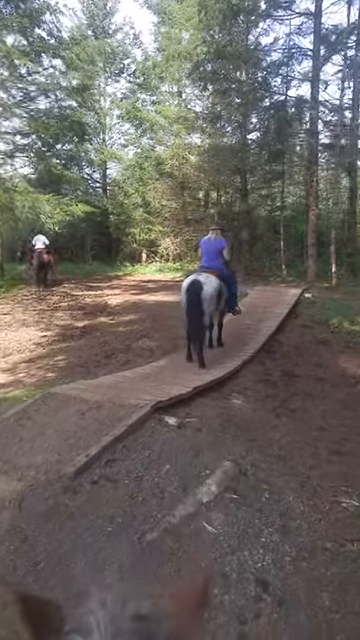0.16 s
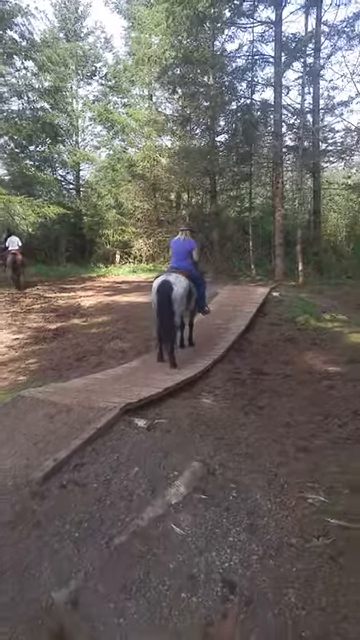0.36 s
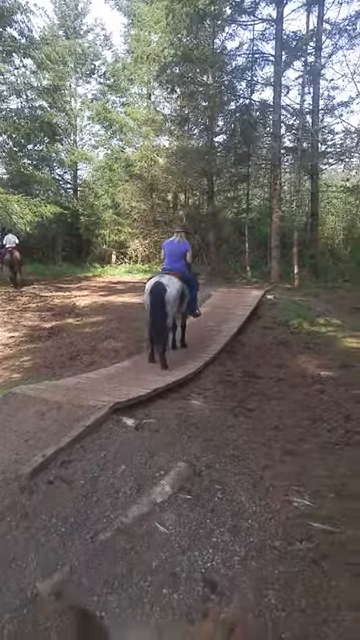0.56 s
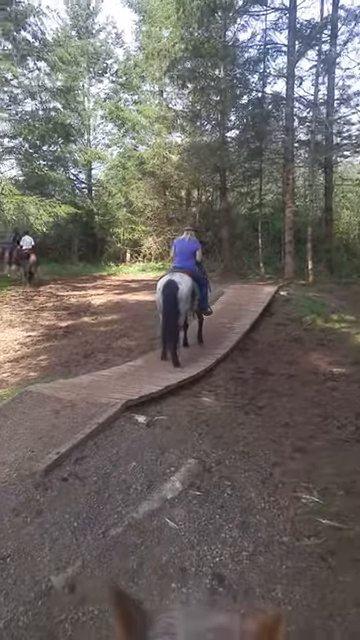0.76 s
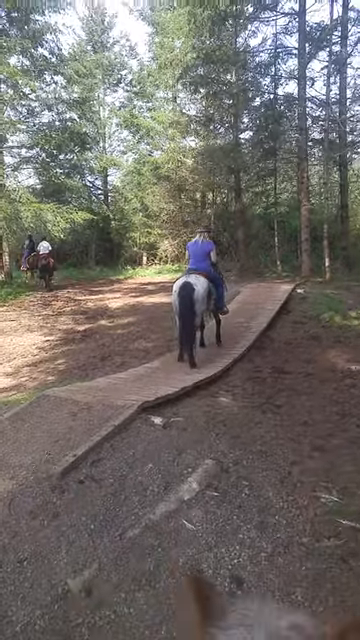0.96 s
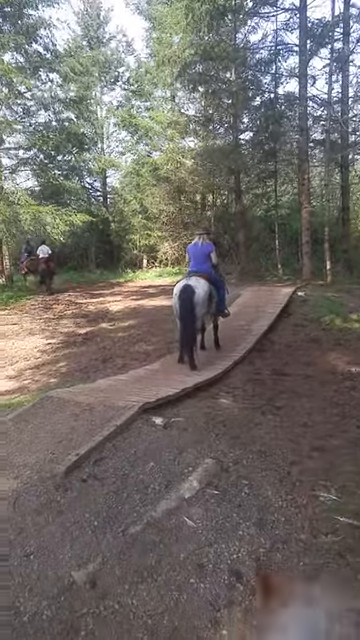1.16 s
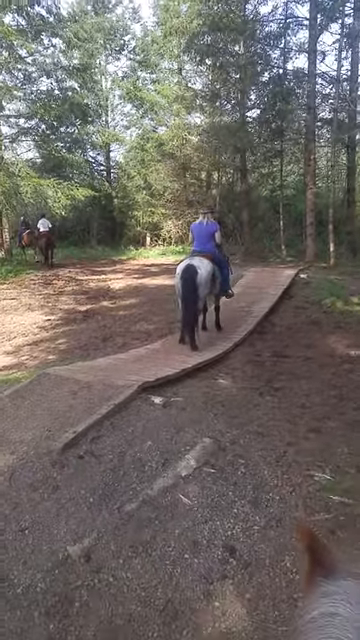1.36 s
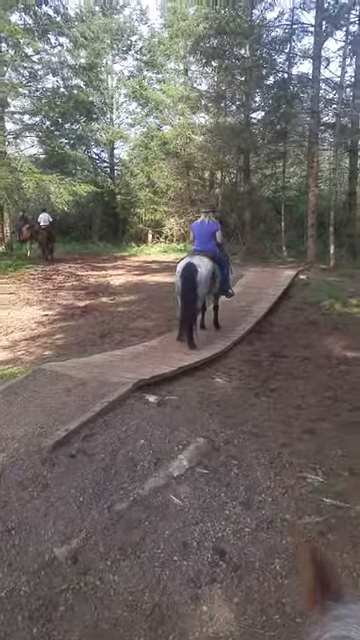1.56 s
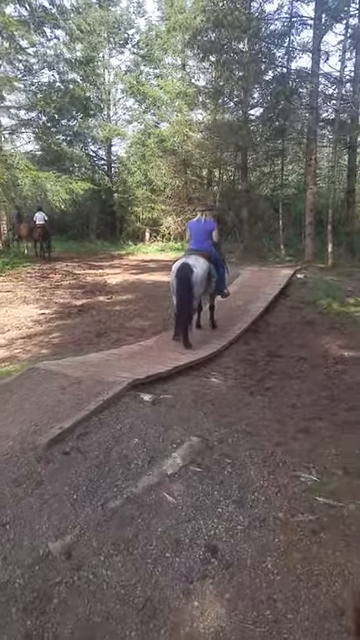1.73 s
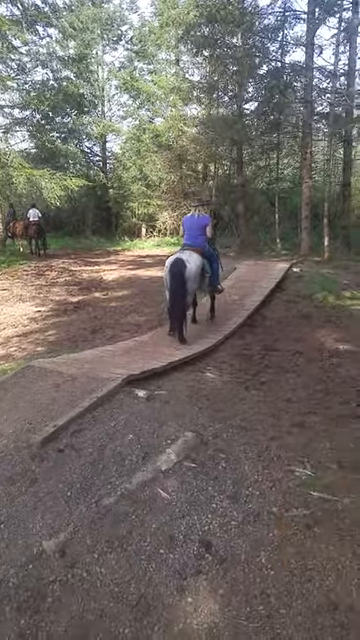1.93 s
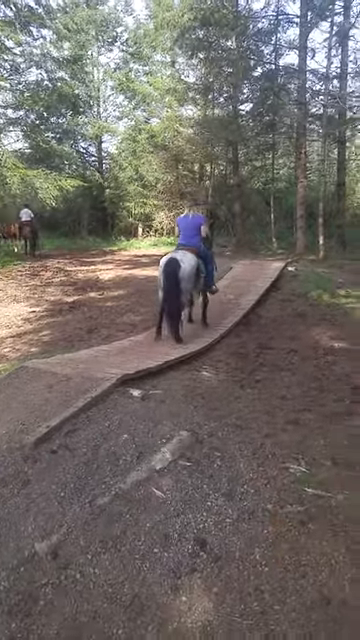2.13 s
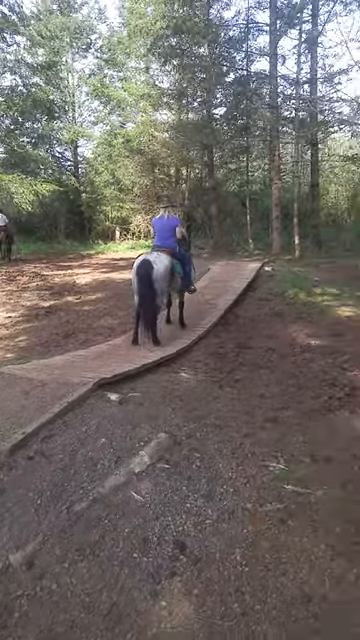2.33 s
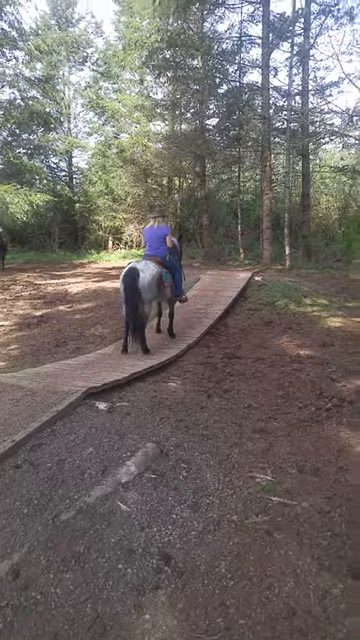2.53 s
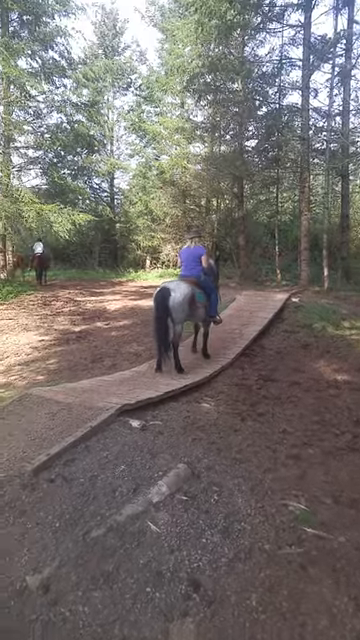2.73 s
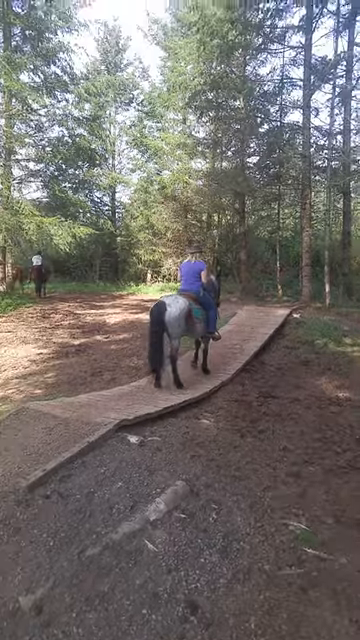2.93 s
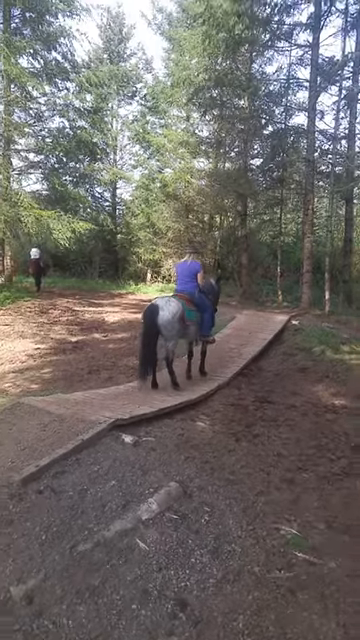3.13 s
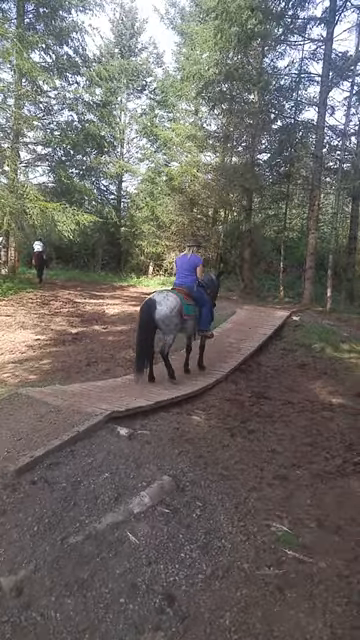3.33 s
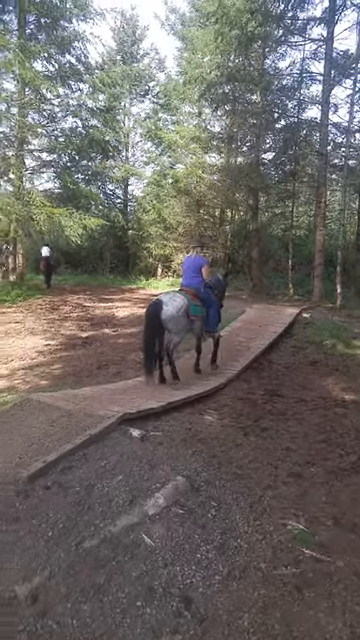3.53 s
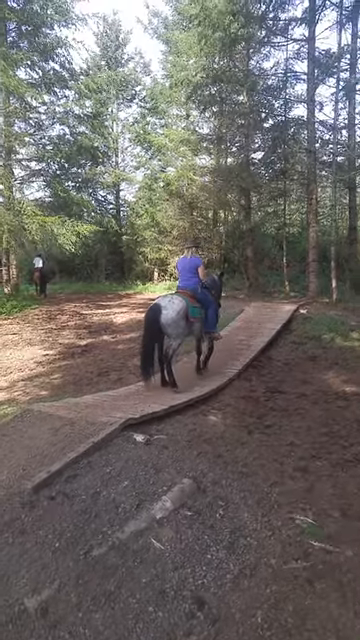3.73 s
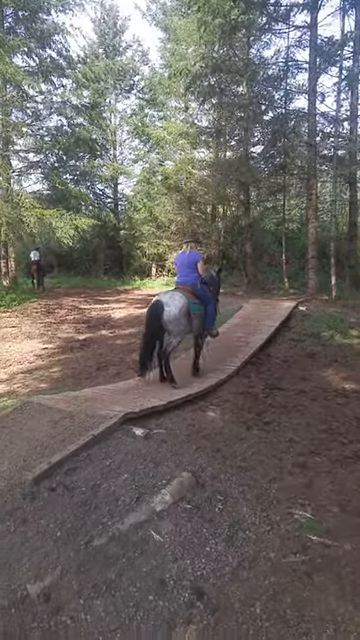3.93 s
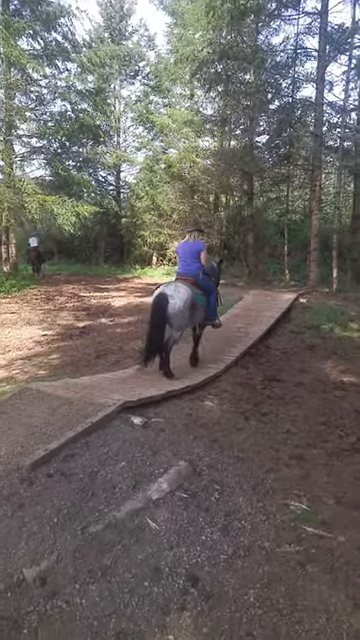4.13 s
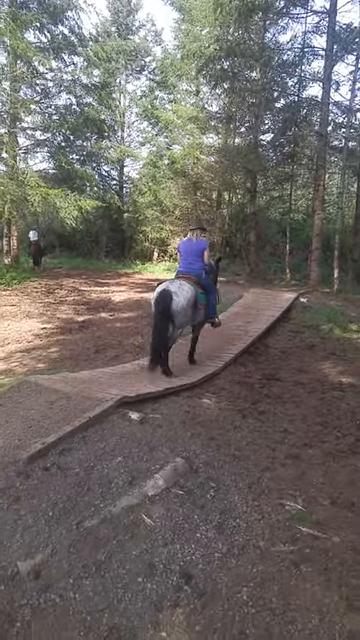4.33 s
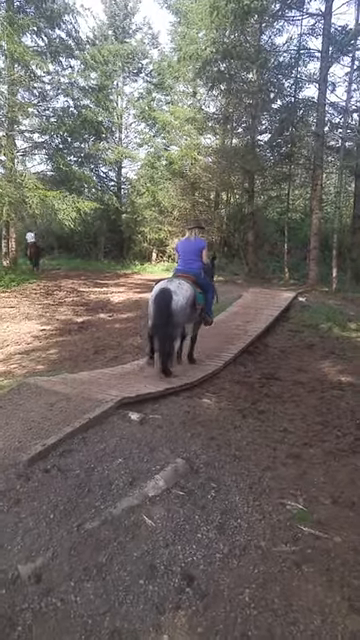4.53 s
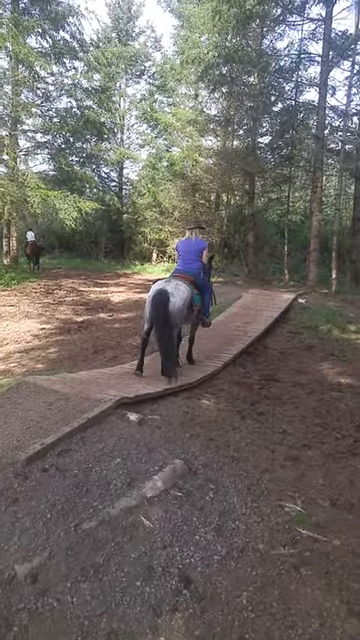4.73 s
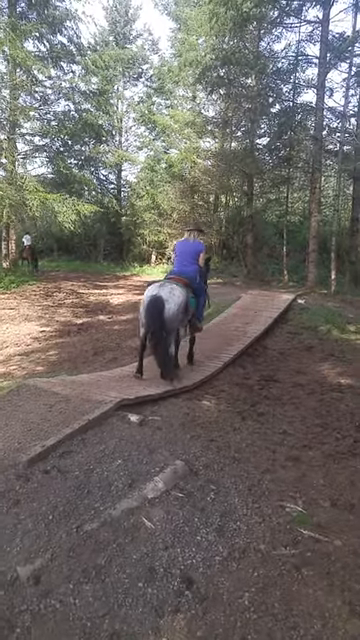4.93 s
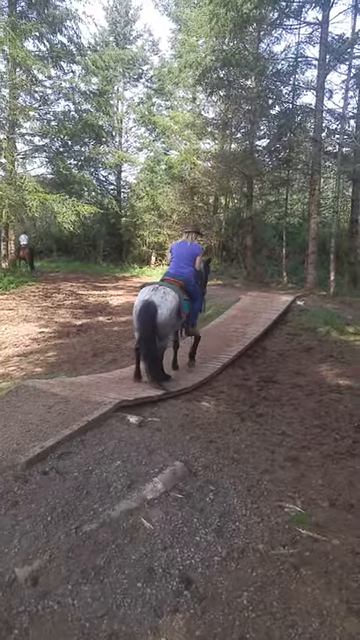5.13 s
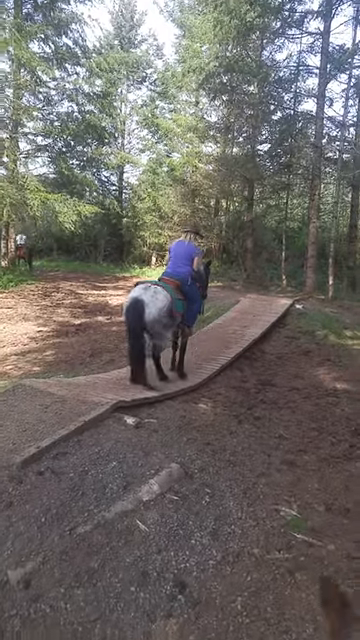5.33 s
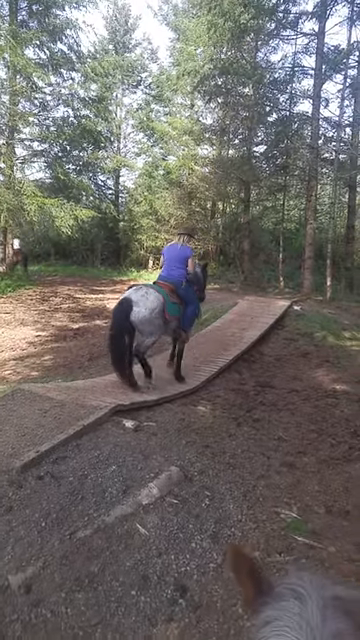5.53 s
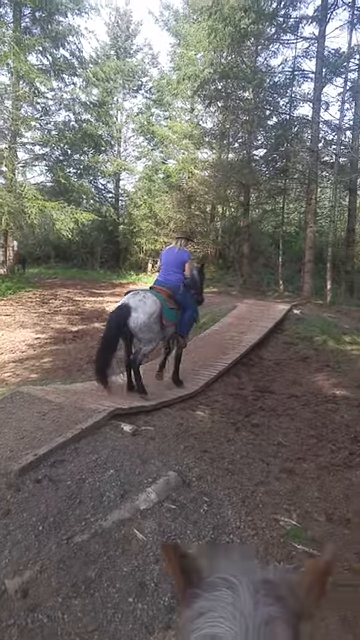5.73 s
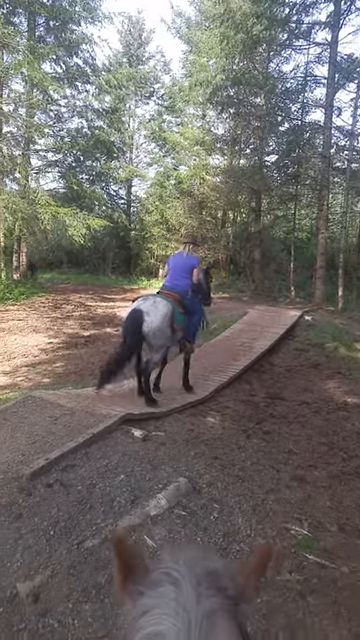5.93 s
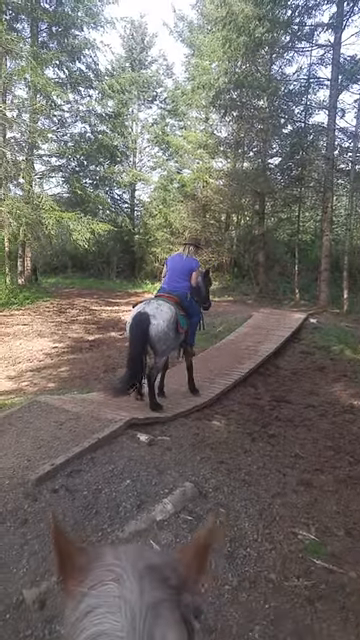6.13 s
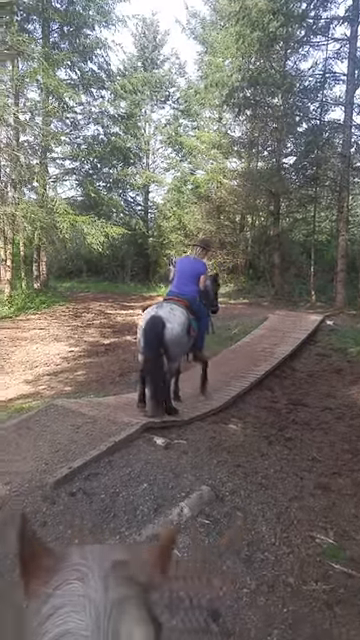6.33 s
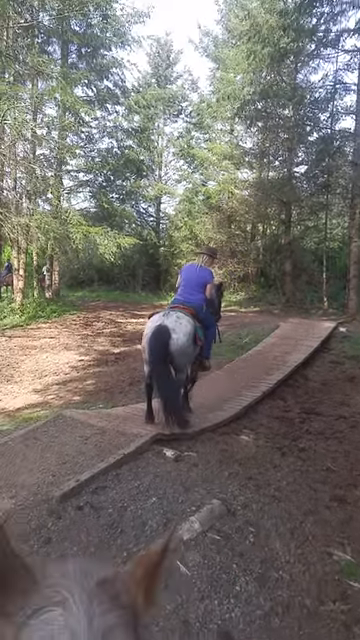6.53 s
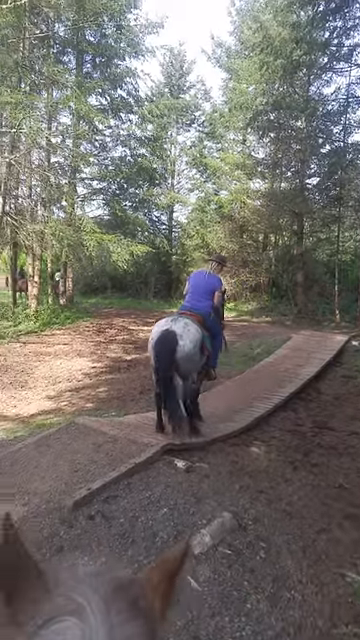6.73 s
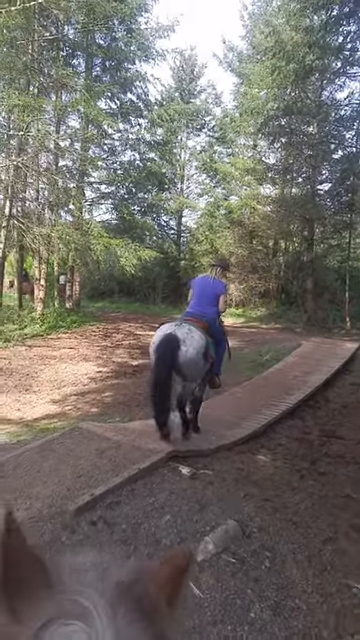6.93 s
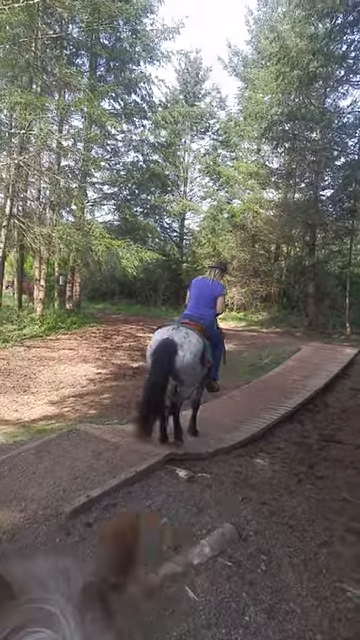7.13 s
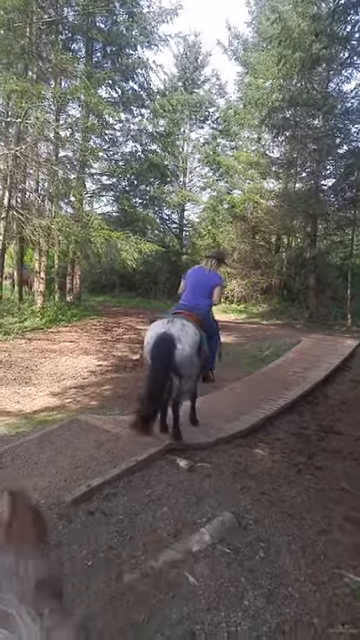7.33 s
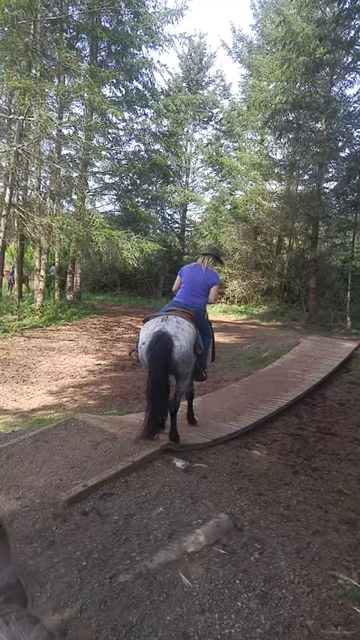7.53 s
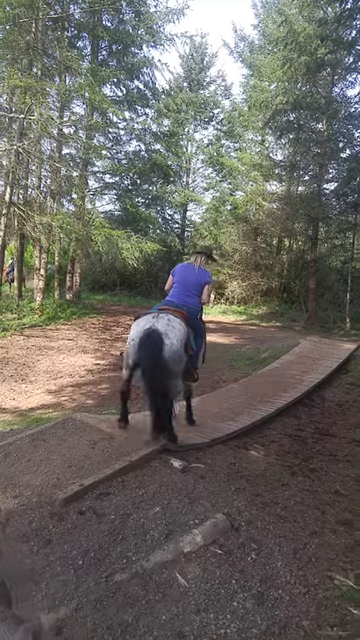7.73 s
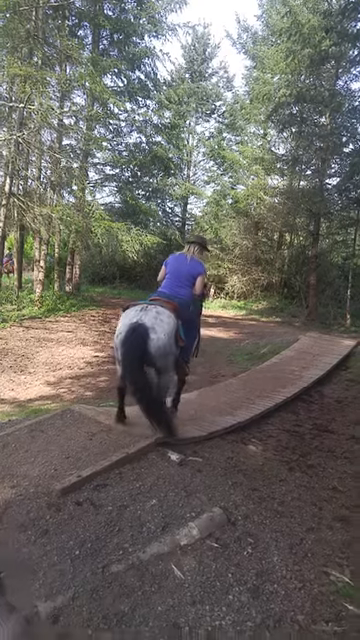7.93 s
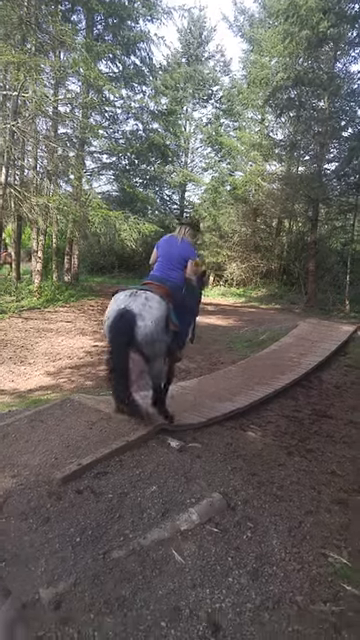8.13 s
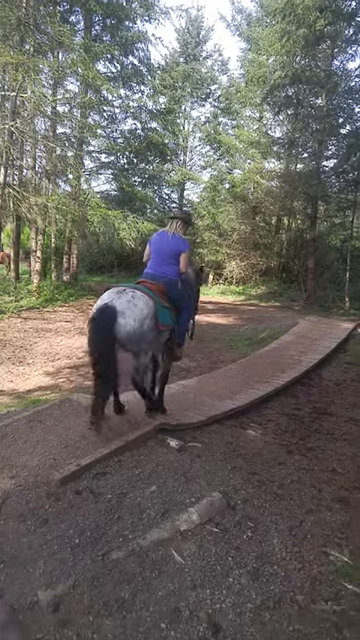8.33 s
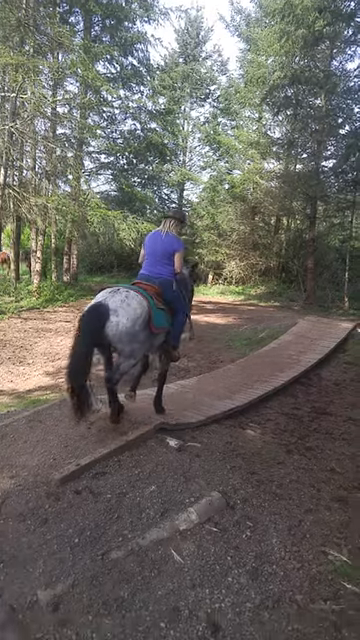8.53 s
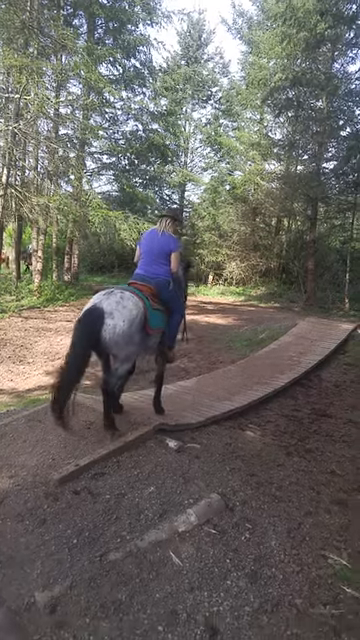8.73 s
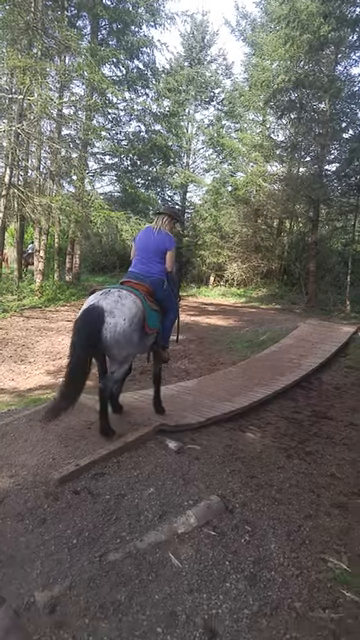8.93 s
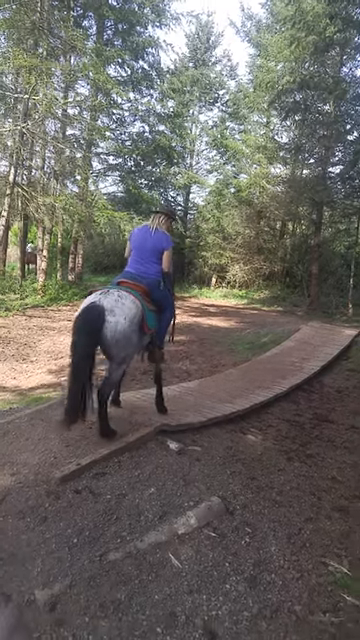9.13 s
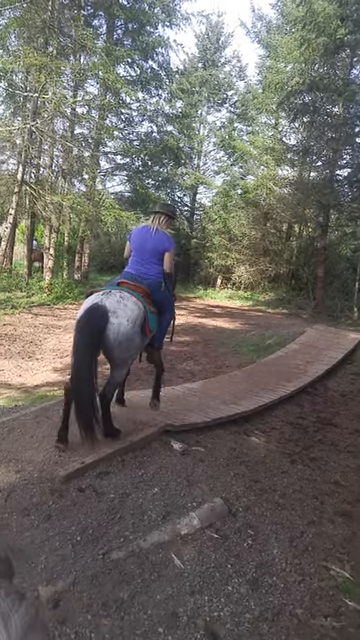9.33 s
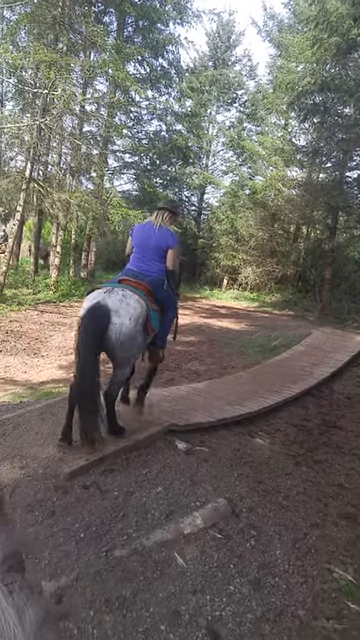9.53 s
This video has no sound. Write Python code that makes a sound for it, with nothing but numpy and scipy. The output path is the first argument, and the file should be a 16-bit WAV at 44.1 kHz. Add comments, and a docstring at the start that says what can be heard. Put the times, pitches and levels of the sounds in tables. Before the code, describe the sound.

Close stereo microphone on a rider in a forest clearing. A horse backs slowly along a wooden deck a few metres off: irregular woody clops, some faint, some heavy, with deep short booms and slight echoes from trees. Nearer, saddle leather squeaks and creaks, cloth brushes, straps and grit tick, and bridle metal clinks lightly. Faint forest air fills the gaps.

```python
"""A low plank bridge in a forest, heard from the saddle of a second horse while a horse backs slowly along.
Hooves knock on the planks as damped modes with noisy cracks, and the deck booms as low sines.
Close by, leaning right, leather creaks and rubs in stick-slip grains, dry ticks of straps and grit
puff as noise, and bridle metal clinks in high modes.
The forest is shaped noise, a rumble and a hush, with a faint far hum of gliding sines."""
import sys
import numpy as np
from scipy import signal
from scipy.fft import rfft, irfft
from scipy.io import wavfile

SR = 44100
rng = np.random.default_rng(int(sys.argv[2]) if len(sys.argv) > 2 else 0)


def volts_from_decibels(level):
    """Turn decibel levels (scalar or array-like) into linear amplitude factors."""
    exponent = np.asarray(level, float) / 20
    return 10 ** exponent


def materialize(psi):
    """Save the field psi as 16-bit PCM at rate SR to the path in sys.argv[1].

    A 1-D psi becomes a single channel; in a 2-D psi each row is a channel.
    """
    bounded = np.clip(np.atleast_2d(psi).T, -1, 1)
    quanta = np.round(bounded * 32767).astype(np.int16)
    wavfile.write(sys.argv[1], SR, quanta)


N = 426518      # samples

# resonances of stiff leather straps: (pitch [Hz], width [Hz], level [dB])
STRAP = [(1430, 230, 6), (1840, 220, 0), (2250, 225, 1.5), (2705, 220, -0.5), (3400, 320, 0),
         (4200, 300, -5.5), (5150, 71, -5.5)]


def rms_one(x):
    """Scale to rms 1."""
    return x / np.sqrt(np.mean(x ** 2) + 1e-20)


def in_time(rows):
    """Table columns joined by straight lines, one value a sample."""
    s, *columns = np.transpose(rows)
    return [np.interp(np.arange(N) / SR, s, c) for c in columns]


def at_hz(points, hz):
    """Read a table on a log-frequency axis."""
    table_hz, values = np.transpose(points)
    return np.interp(np.log(hz), np.log(table_hz), values)


def colour(x, spectrum):
    """Shape by a (Hz, dB) spectrum."""
    hz = np.maximum(np.arange(N // 2 + 1) * SR / N, 1)
    return irfft(rfft(x) * volts_from_decibels(at_hz(spectrum, hz)), N)


def drift(per_s):
    """Slow random wander of rms 1: noise through two equal low-pass poles at per_s Hz."""
    r = np.exp(-80 * np.pi * per_s / SR)      # computed at every 40th sample
    slow = signal.lfilter([1], [1, -2 * r, r * r], rng.standard_normal(N // 40 + 2002))[2000:]
    return np.interp(np.arange(N) / 40, np.arange(len(slow)), rms_one(slow))


def grains(per_s, spread_db):
    """Random clicks of uneven size and sign."""
    size_db = spread_db * np.minimum(rng.exponential(1, N), 4)
    sizes = volts_from_decibels(size_db) * rng.choice([-1, 1], N)
    return sizes * (rng.random(N) < per_s / SR)


def band(x, low_hz, high_hz):
    """Gentle band-pass."""
    return signal.sosfilt(signal.butter(2, [low_hz, high_hz], "band", fs=SR, output="sos"), x)


def stereo(mid, side):
    """Left and right grow less alike towards the treble."""
    # likeness of the two ears: (frequency [Hz], correlation [0 to 1])
    likeness = [(100, 1), (300, 0.92), (700, 0.59), (2000, 0.16), (8000, 0.038)]
    hz = np.maximum(np.arange(N // 2 + 1) * SR / N, 1)
    alike = np.clip(at_hz(likeness, hz), 0, 1)
    m = rfft(mid) * np.sqrt((1 + alike) / 2)
    s = rfft(side) * np.sqrt((1 - alike) / 2)
    return np.sqrt(2) * irfft(np.array([m + s, m - s]), N)


def from_right(x, lean_db):
    """A near source on the right reaches the left port 20 samples later and softer."""
    return np.array([volts_from_decibels(-lean_db / 2) * np.roll(x, 20), volts_from_decibels(lean_db / 2) * x])


def modes(table, strengths, contact_s, stretch=0.92):
    """Damped sines that swell over the contact time; peak 1; stretch scales the ring times."""
    t = np.arange(SR // 3) / SR
    hz, level_db, t60 = np.transpose(table)[:, :, None]
    decay = volts_from_decibels(level_db - 60 * t / (t60 * stretch))
    rings = decay * strengths[:, None] * np.sin(2 * np.pi * hz * t)
    x = rings.sum(axis=0) * (1 - np.exp(-(t / contact_s) ** 2))
    return x / np.max(np.abs(x))


def resonate(x, table, strengths):
    """Two-pole resonances side by side, signs alternating."""
    out = 0
    for k, ((hz, width_hz, level_db), strength) in enumerate(zip(table, strengths)):
        r = np.exp(-np.pi * width_hz / SR)
        zeros = [(1 - r * r) / 2, 0, (r * r - 1) / 2]
        poles = [1, -2 * r * np.cos(2 * np.pi * hz / SR), r * r]
        out = out + (-1) ** k * strength * volts_from_decibels(level_db) * signal.lfilter(zeros, poles, x)
    return out


def tones(rows, waver, arch):
    """Wavering sines that glide evenly, swell and fade along an arch."""
    out, t = np.zeros(N), np.arange(N) / SR
    for s, length_s, first_hz, last_hz, level_db in rows:
        way = np.clip((t - s) / length_s, 0, 1)
        hz = (first_hz + (last_hz - first_hz) * way) * (1 + waver)
        swell = (4 * way * (1 - way)) ** arch
        out += np.sqrt(2) * volts_from_decibels(level_db) * swell * np.sin(2 * np.pi * np.cumsum(hz) / SR)
    return out


def add(out, x, s):
    """Mix a short sound in at s seconds."""
    i = min(max(round(s * SR), 0), N)
    out[..., i:i + x.shape[-1]] += x[..., :N - i]


def forest():
    """Low lumpy rumble and a hush above it, both wide shaped noise, and the far hum of gliding sines."""
    # spectrum of the forest air: (frequency [Hz], level [dB])
    air_spectrum = [(18, -24), (30, -16), (92, -6), (198, -12.5), (401, -4), (520, -12), (593, -3.5),
                    (676, -2), (1520, -18), (3090, -30), (3910, -26.5), (5070, -30.5), (7710, -26.5),
                    (8570, -26.5), (15600, -35.5)]
    # course of the forest before fixed gains: (time [s], rumble level [dB], hush level [dB])
    air_levels = [(0, -68.5, -64.5), (2.7, -71, -69.5), (3.3, -70.5, -65.5), (4.2, -75.5, -69.5),
                  (6.5, -74.5, -66), (9.67, -78.5, -71)]
    # faint far hum: (start [s], length [s], first pitch [Hz], last pitch [Hz], peak rms level [dB])
    far_hums = [(.38, 0.85, 176.5, 192.3, -62.5), (1.1, 0.37, 132.9, 136.6, -63),
                (2.4, 0.45, 136.8, 137.6, -64)]
    rumble_db, hush_db = in_time(air_levels)
    air = colour(stereo(*rng.standard_normal((2, N))), air_spectrum)
    low = signal.sosfiltfilt(signal.butter(2, 170, fs=SR, output="sos"), air)
    rumble = volts_from_decibels(rumble_db + 11.5 + 2.0 * drift(3.6)) * rms_one(low)
    hush = volts_from_decibels(hush_db + 5.5 + 1.77 * drift(50)) * rms_one(air - low)
    return rumble + hush + tones(far_hums, 0.0064 * drift(1.7), arch=0.1)


def shifting():
    """Creak and rustle gains as the rider shifts: each rises, holds for its length and dies away."""
    # shifts in the saddle: (start [s], length [s], creak level [dB], rustle level [dB])
    rider_shifts = [(0.031, 0.17, -52, -59.5), (0.2, 0.089, -42, -61), (0.375, 0.077, -54, -61),
                    (0.511, 0.045, -51.5, -99), (0.803, 0.21, -51, -65.5), (1.128, 0.065, -50, -83),
                    (1.36, 0.22, -52, -73), (2.762, 0.2, -53.5, -62.5), (3.022, 0.29, -45, -54.5),
                    (3.351, 0.22, -48, -56.5), (3.772, 0.3, -59, -71.5), (4.433, 0.11, -75, -78),
                    (4.656, 0.033, -56, -59.5), (4.807, 0.025, -74, -64.5), (5, 0.11, -64.5, -67),
                    (5.324, 0.11, -53, -61.5), (6.375, 0.19, -48.5, -60), (6.605, 0.17, -47, -69),
                    (6.802, 0.17, -57, -65), (7.814, 0.052, -51, -59), (8.374, 0.072, -55.5, -67),
                    (8.682, 0.038, -70, -71), (9.447, 0.09, -61.5, -68.5)]
    attack_s, release_s = 0.036, 0.026
    swell = 0.25      # share of its level that a shift still gains while it holds
    t, gains = np.arange(N) / SR, np.zeros((2, N))
    for s, length_s, creak_db, rustle_db in rider_shifts:
        rise = np.clip((t - s) / attack_s, 0, 1)
        fall = np.exp(-np.maximum(t - s - length_s, 0) / release_s)
        hold = 1 - swell * np.clip(1 - (t - s) / length_s, 0, 1)
        gains += volts_from_decibels(np.array([[creak_db], [rustle_db]])) * rise * fall * hold
    return gains


def saddle():
    """Stick-slip grains ring in the leather's body; finer grains in clumps give the rub and the brushing."""
    # resonances of the leather body: (pitch [Hz], width [Hz], level [dB])
    leather_body = [(258, 163, -1), (360, 130, 6.5), (427, 161, 1), (599, 53, 1), (720, 223, -5)]
    # short leather squeaks before wander: (start [s], length [s], first [Hz], last [Hz], peak rms level [dB])
    squeak_glides = [(2.04, 0.12, 359, 312, -51.5), (2.86, 0.11, 285, 326, -49),
                     (3.93, 0.1, 349, 314, -52.5), (5.61, 0.05, 378, 340, -56.5),
                     (6.19, 0.1, 234, 340, -51), (6.72, 0.076, 362, 362, -44.5)]
    # spectrum of leather rubbing: (frequency [Hz], level [dB])
    rub_spectrum = [(530, -41), (900, 24), (2200, -4), (3200, -7), (5530, 13.5), (8710, -25), (15600, -83)]
    # spectrum of brushing cloth and hair: (frequency [Hz], level [dB])
    cloth_spectrum = [(710, -36), (1200, 5.5), (1500, 3), (2600, -1), (3200, 1), (4200, -8), (5280, -7),
                      (6770, -4), (8570, 1.5), (15600, -34.5)]
    # cloth and hair between shifts, before wander: (time [s], level [dB])
    stirring = [(0, -74), (2.1, -67.5), (2.6, -78), (4, -75.5), (5.5, -75.5), (6.3, -82), (7.7, -82),
                (8.9, -68.5), (9.67, -78.5)]
    creak_gain, rustle_gain = shifting()

    slips_per_s = 99      # mean pace of the leather's catch and release
    catch = np.cumsum(slips_per_s * (1 + .2 * drift(6.0))) / SR % 1      # phase within one slip
    slips = grains(900, 1.0) * volts_from_decibels(0.48 * drift(32)) * (0.35 + np.exp(-catch / 0.11))
    body = resonate(slips, leather_body, np.ones(len(leather_body)))
    squeaks = volts_from_decibels(3.0 * drift(29)) * tones(squeak_glides, 0.018 * drift(33.5), arch=1.6)
    creak = creak_gain * rms_one(body) + squeaks

    unrest = volts_from_decibels(2.8 * drift(18))
    clumps = volts_from_decibels(3.4 * drift(98))
    # one layer common to both ears, then one for each ear
    fine = [clumps * (grains(700, 5.33) + 0.27 * rng.standard_normal(N)) for k in range(3)]
    common, each_ear = fine[0], np.array(fine[1:])

    rub_grains = common + 0.52 * clumps * grains(110, 2.1) + 0.48 * each_ear
    rub_gain = rustle_gain * (0.18 + np.exp(-catch / 0.099))
    rub = rub_gain * rms_one(colour(rub_grains, rub_spectrum))

    flutter = volts_from_decibels(in_time(stirring)[0]) * unrest + rustle_gain
    brushing = 1.4 * common + 0.62 * grains(69, 6.4) + each_ear
    cloth = flutter * rms_one(colour(brushing, cloth_spectrum))
    # fine grains and sparse grit ring in the straps, pulsing with each slip
    strap_ring = resonate(0.49 * each_ear + 4.5 * grains(150, 3.8), STRAP[:4], np.ones(4))
    strap_gain = rustle_gain * (0.18 + np.exp(-catch / 0.2))
    cloth = 0.91 * cloth + 1.4 * strap_gain * rms_one(strap_ring)

    def lean_right(x, lean_db):
        """Delay and soften the left of an already two-eared sound."""
        return np.array([from_right(x[0], lean_db)[0], from_right(x[1], lean_db)[1]])

    return from_right(creak, lean_db=0.9) + lean_right(rub, 5.5) + lean_right(cloth, 2.7)


def ticks():
    """Dry puffs of noise a few milliseconds long; they hiss on top and ring briefly in the strap."""
    # ticks of straps and grit, levels before fixed gains: (time [s], level [dB],
    # strap ring over hiss [dB], left over right [dB], strongest strap pitch [Hz])
    dry_ticks = [(0.081, -46.5, 8, -3, 1600), (0.092, -39, 8, -4, 1840), (0.11, -50, 6, -1, 1400),
                 (0.2506, -43, -14, -6, 2300), (0.272, -36.5, -9, -4, 2300), (0.9474, -45, 2, -8, 2300),
                 (2.7749, -45.5, -16, 1, 4200), (3.079, -44, 3, -4, 4200), (3.2038, -39, 1, -2, 2300),
                 (3.2929, -54, 15, 2, 2300), (3.5347, -43, -16, -13, 2270), (3.808, -51.5, 8, -9, 1830),
                 (4.174, -49, 0.5, -5, 2600), (4.683, -63, 17, 3, 2660), (4.7085, -50.5, 13.5, -4, 2300),
                 (5.096, -42, -8.5, -3, 2640), (5.3437, -48, -9, 4.5, 2300), (5.765, -35.5, -6, -1, 2600),
                 (6.051, -49.5, -3, -3.5, 2300), (6.223, -53, 6, -4, 2300), (6.396, -49, 0, -6, 4200),
                 (6.699, -55, 17, -2, 2000), (6.721, -53, 11, -9, 1840), (7.1213, -50.5, -6, -9, 2600),
                 (7.825, -49, -6, 9, 3400), (7.8428, -33.5, -31, 3, 3400), (8.151, -54.5, 8, -4, 2330),
                 (8.412, -45, -7, 2, 3800), (8.687, -39, 5, 5, 3400), (8.691, -38, 6.5, -6, 2500),
                 (8.7127, -36, -2, 2, 2900), (8.718, -41, -6, 1, 2500), (9.072, -48, -1, 9, 2600),
                 (9.458, -41.5, -8, 3, 2650), (9.652, -50.5, 1, 6, 3400)]
    out, t = np.zeros((2, N)), np.arange(SR // 12) / SR
    shape = (volts_from_decibels(-60 * t / 0.014) + volts_from_decibels(-19 - 60 * t / 0.12)) * (1 - np.exp(-t / 0.0003))
    strap_hz = np.array(STRAP)[:, 0]
    for s, level_db, low_db, pan_db, hz in dry_ticks:
        noise = rng.standard_normal((2, len(t)))
        lumps = np.repeat(volts_from_decibels(2.1 * rng.standard_normal(len(t) // 90 + 1)), 90)[:len(t)]
        noise = (noise + 0.46 * noise[0]) * lumps      # gritty, in 2 ms lumps
        hiss = rms_one(band(band(noise, 6000, 9160), 5700, 15500)) * shape
        ring = resonate(noise * shape, STRAP, volts_from_decibels(-12.0 * np.abs(np.log2(strap_hz / hz))))
        puff = hiss + volts_from_decibels(low_db + 2.0) * ring / np.max(np.abs(ring))
        ears_db = level_db - 4.0 + np.array([[pan_db / 2], [-pan_db / 2]])
        add(out, volts_from_decibels(ears_db) * puff, s - .001)
    return out


def hooves():
    """Knock of the planks nearest in pitch, the hollow below, a crack with grit, and echoes off the trunks."""
    # hoof on plank, levels before fixed gains: (time [s], knock level [dB], knock pitch [Hz],
    # hollow over knock [dB], crack over knock [dB])
    hoof_falls = [(0.094, -45.5, 870, 1, -3), (1.87, -45, 720, -4, -14), (2.168, -32.5, 630, -7, -10.5),
                  (2.236, -38, 672, -7, -12), (2.805, -40, 678, -31, -12), (3.11, -34.5, 623, -1, -31),
                  (3.72, -23, 724, -10.5, -14), (3.926, -30, 684, -7.5, -25.5), (4.366, -45.5, 620, 1, -18),
                  (4.526, -44.5, 670, -3.5, -8.5), (4.701, -47, 636, -11, -9),
                  (4.839, -28, 678, 3.5, -15.5), (5.345, -19, 697, -10, -13),
                  (5.752, -12, 597, -14.5, -23.5), (6.008, -32.5, 580, -7, -25),
                  (6.404, -32.5, 670, 3.5, -11), (6.681, -30.5, 618, -4.5, -18.5),
                  (7.186, -40, 837, 1.5, -16), (7.193, -45, 1000, 9, -2.5), (7.205, -38, 611, -11, -16),
                  (7.316, -30.5, 662, -0.5, -17.5), (7.757, -50, 773, -24, -20),
                  (7.825, -37.5, 770, 0, -12), (7.842, -23.5, 772, 0.5, -14.5),
                  (8.192, -24, 658, -10, -20.5), (8.414, -49.5, 714, 1, -6), (8.692, -39, 705, -10, -8),
                  (8.792, -35.5, 593, 5, -14), (9.217, -52.5, 700, 3, -4), (9.459, -50, 610, -5, -13),
                  (9.487, -49.5, 697, -1.5, -11), (9.54, -51.5, 700, 8, -15)]
    # plank modes: (pitch [Hz], level [dB], ring time before stretch [s])
    plank_modes = [(597, 10, 0.056), (637.4, 8.5, 0.093), (666, 11, 0.038), (772, -4, 0.072),
                   (796.6, 5.5, 0.14), (965, 24, 0.024), (1200, -17, .04), (1380, -19, 0.062)]
    # air hollow under the deck: (pitch [Hz], level [dB], ring time before stretch [s])
    hollow_modes = [(210, -1.5, 0.062), (266.8, -6, 0.078), (340, -3, 0.07), (432.4, 4, 0.048)]
    echo_s, echo_db = .086, -25      # the knock returns once from the nearest trunks
    out, t = np.zeros((2, N)), np.arange(SR // 3) / SR
    chance = rng.standard_normal((len(hoof_falls), 12))
    plank_hz = np.array(plank_modes)[:, 0]
    damped = 0.65 * np.exp(-(t / 0.016) ** 2) + 0.41      # the hoof stays down and muffles the plank
    clack_decay = volts_from_decibels(-60 * t / 0.045) + volts_from_decibels(-0.5 - 60 * t / 0.24)
    grit_decay = volts_from_decibels(-11.5 - 60 * t / 0.012) + volts_from_decibels(-14.0 - 60 * t / 0.24)
    for (s, knock_db, knock_hz, hollow_db, crack_db), draw in zip(hoof_falls, chance):
        # a hard landing wakes more modes: less loss [dB] per octave from the knock pitch
        spread_db = np.clip(-1.6 * (crack_db - 3.5), 6, 50)
        near = volts_from_decibels(-spread_db * np.abs(np.log2(plank_hz / knock_hz)) + 4.0 * draw[:8])
        contact_s = 0.00626 * (600 / knock_hz) ** 3      # a flatter landing is slower and lower
        knock = damped * modes(plank_modes, near, contact_s)
        add(out, volts_from_decibels(knock_db + 2.5) * knock, s - 0.826 * contact_s)
        echo = modes(plank_modes, near, 0.0042, stretch=1.8) * [[1], [.7]]
        add(out, volts_from_decibels(knock_db + echo_db) * echo, s + echo_s)

        hollow = modes(hollow_modes, volts_from_decibels(2.0 * draw[8:]) * np.sign(draw[8:]), 0.0069)
        add(out, volts_from_decibels(knock_db + hollow_db + np.array([[1.5], [-1.5]])) * hollow, s)

        noise = rng.standard_normal((3, 2, len(t)))
        clack = rms_one(band(noise[0] + 0.23 * noise[0, 0], 620, 1278)) * clack_decay
        grit = rms_one(band(noise[2] + 0.7 * noise[2, 0], 1800, 3370)) * grit_decay
        crack = (clack + volts_from_decibels(-3.0) * grit) * (1 - np.exp(-t / 0.00035))
        add(out, volts_from_decibels(knock_db + crack_db - 6.0) * crack, s - .002)

        # scattered echoes carry the knock on, other ones at each ear
        echoes = rms_one(band(band(noise[1] + 0.51 * noise[1, 0], 426, 822), 453, 830))
        echoes = echoes * volts_from_decibels(-60 * t / 0.16) * (1 - np.exp(-(t / 0.0013) ** 2))
        add(out, volts_from_decibels(knock_db - 12.0) * echoes, s)
    return out


def bridle():
    """Each clink is a quick chatter of touches: a snap, and the modes near its pitch ring strongest."""
    # bridle metal struck, before touch gains: (time [s], level [dB], share of the full ring time,
    # strongest pitch [Hz])
    clinks = [(1.719, -46.5, 0.65, 8500), (2.0944, -46, 0.97, 9620), (3.0605, -33.5, 0.094, 8550),
              (3.5513, -39.5, 0.31, 8670), (3.863, -43, 0.55, 6160), (3.943, -48.5, 0.46, 8700),
              (3.9607, -49.5, 0.44, 7340), (4.4302, -33.5, 0.24, 9620), (4.5462, -30, 0.097, 9590),
              (4.551, -44.5, 0.47, 9630), (4.8224, -27, 0.49, 8800), (4.8261, -35.5, 0.5, 9790),
              (4.964, -46, 0.55, 9600), (4.9848, -35.5, 0.21, 11470), (5.71, -46, 0.99, 9200),
              (6.515, -45.5, 0.17, 8800)]
    # bridle modes before chance variation: (pitch [Hz], level [dB], full ring time [s])
    metal_modes = np.array([(5470, 5.5, 0.04), (6460, 7.5, 0.025), (6660, -22.5, 0.41), (6950, -25, 0.048),
                            (7340, -13, 0.31), (8610, 4, 0.039), (9486, 7.5, 0.048), (9790, -3, 0.22),
                            (10270, -15, 0.046), (11650, -5.5, 0.14), (11000, -5, .04), (14300, -31, 0.039)])
    touches = [(0, 2), (.0025, -11.5), (.007, -4)]      # (delay [s], level [dB])
    out, t = np.zeros(N), np.arange(SR // 50) / SR
    chance = rng.standard_normal((len(clinks), 3, len(metal_modes)))
    for (s, level_db, stretch, hz), draw in zip(clinks, chance):
        octaves = np.log2(metal_modes[:, 0] / hz)
        near_db = -9 * np.abs(octaves) + 16 * np.exp(-(octaves / 0.019) ** 2)
        for k, (late_s, touch_db) in enumerate(touches):
            # other links touch each time: pitches, ring times and mode strengths all vary
            vary = np.transpose([1 + 0.013 * draw[k, ::-1], np.ones(len(metal_modes)), volts_from_decibels(2.0 * draw[k - 1])])
            strengths = volts_from_decibels(near_db + 2.0 * draw[k]) * np.sign(draw[k])
            ring = modes(metal_modes * vary, strengths, 0.00056, stretch)
            add(out, volts_from_decibels(level_db + touch_db) * ring, s + late_s - .001)
            snap = rms_one(band(rng.standard_normal(len(t)), 2500, 14000)) * volts_from_decibels(-60 * t / 0.013)
            add(out, volts_from_decibels(level_db + touch_db - 20.5) * snap, s + late_s - .001)
    return from_right(out, lean_db=10.0)


def deck():
    """The deck booms under the weight: a slow damped sine with a short upper partner."""
    # booms: (time [s], peak level [dB], pitch [Hz])
    deck_booms = [(2.172, -25.5, 116.4), (2.239, -29, 91), (3.114, -28, 126), (3.723, -29.5, 78),
                  (3.925, -33, 107), (4.687, -46, 120), (4.844, -25, 79), (5.345, -25, 112),
                  (5.388, -32.5, 69), (5.75, -26.5, 75), (6.008, -35, 67.4), (6.414, -19, 56.5),
                  (6.684, -25.5, 71), (7.193, -35, 67.4), (7.323, -24, 62.6), (7.842, -24, 121),
                  (8.195, -34.5, 132), (8.22, -32.5, 76), (8.712, -43, 80), (8.792, -28, 69),
                  (9.47, -41.5, 66.3)]
    out = np.zeros(N)
    for s, level_db, hz in deck_booms:
        t60 = .14 * (70 / hz) ** 1.03      # higher booms are shorter; modes() stretches this
        pair = [(hz, 0, t60), (2.26 * hz, -9, 0.29 * t60)]
        add(out, volts_from_decibels(level_db) * modes(pair, np.ones(2), 0.0022), s - .003)
    return np.array([out, 0.956 * np.roll(out, 3)])      # a little to the left


def scene():
    """Forest, near tack and the other horse on the bridge together."""
    return forest() + saddle() + ticks() + hooves() + bridle() + deck()


def roll_off(x):
    """The treble ends steeply here."""
    return signal.sosfilt(signal.butter(12, 15790, fs=SR, output="sos"), x)


def record(dry):
    """The microphone has a narrow, partial dip near 520 Hz and cuts the deep bass."""
    b, a = signal.iirnotch(522, 6.0, SR)
    dipped = dry + 0.36 * (signal.lfilter(b, a, dry) - dry)
    mix = signal.sosfilt(signal.butter(6, 48, "high", fs=SR, output="sos"), dipped)
    return roll_off(mix)


dry = scene()
out = record(dry)
materialize(out)
```